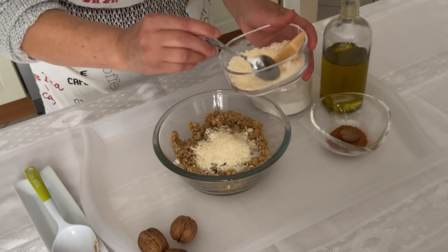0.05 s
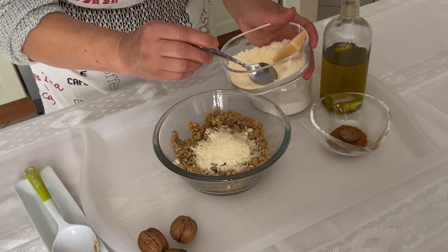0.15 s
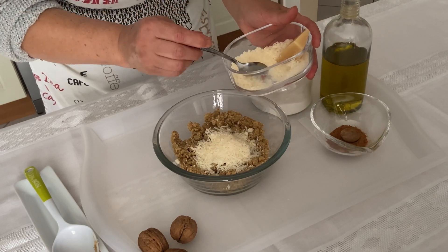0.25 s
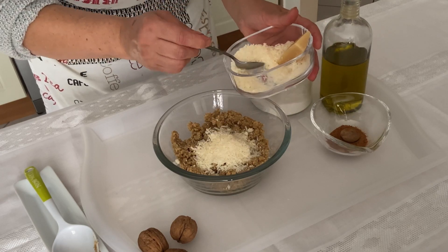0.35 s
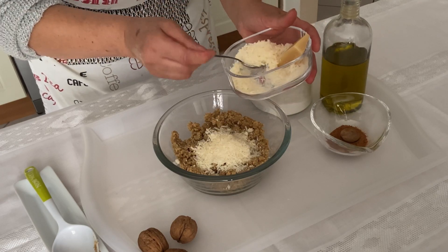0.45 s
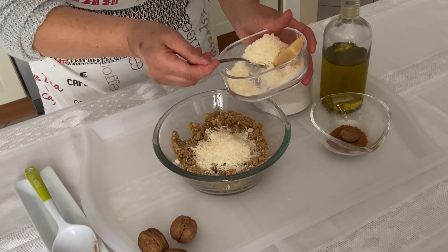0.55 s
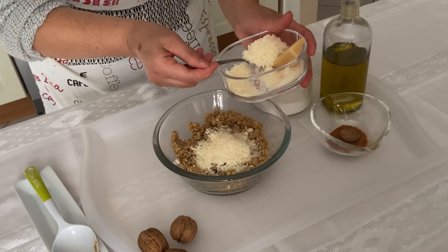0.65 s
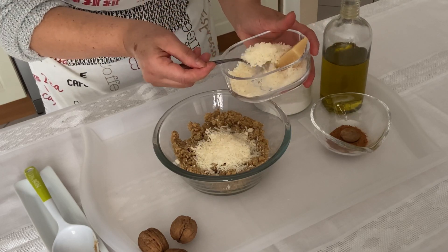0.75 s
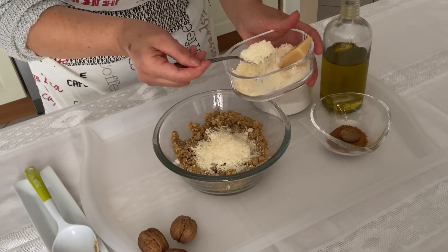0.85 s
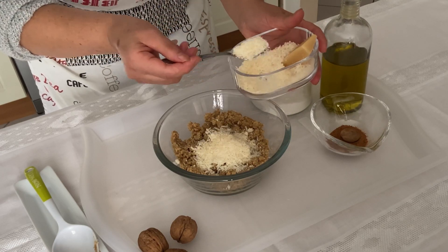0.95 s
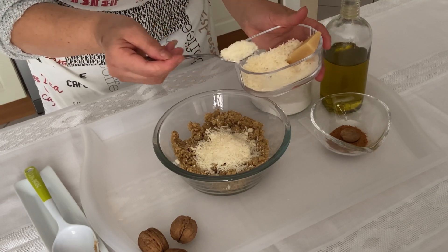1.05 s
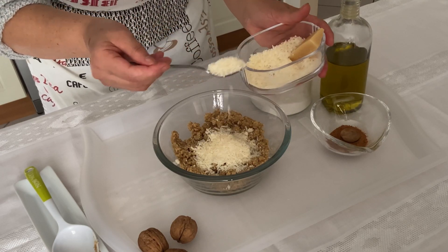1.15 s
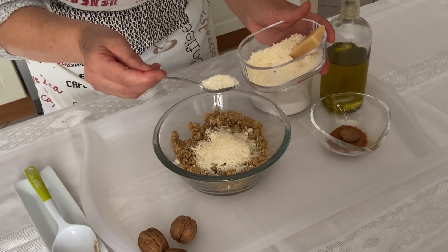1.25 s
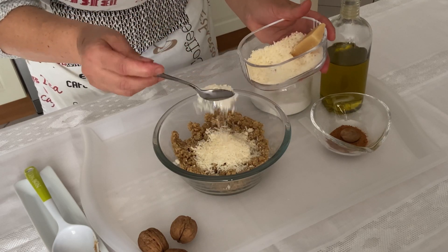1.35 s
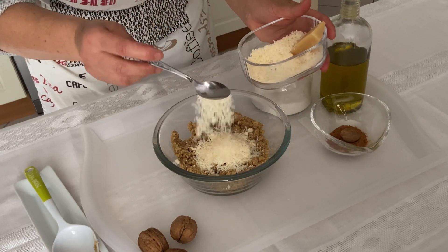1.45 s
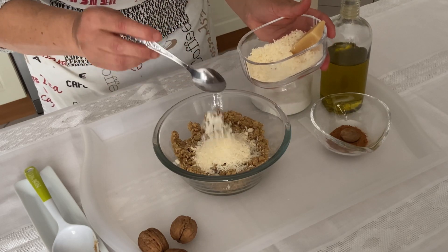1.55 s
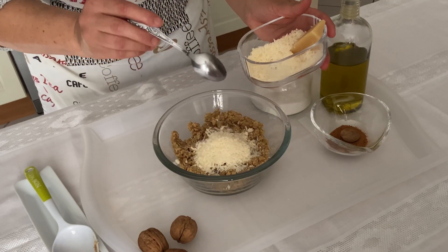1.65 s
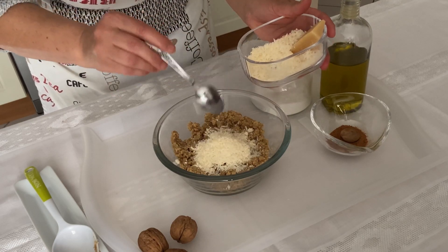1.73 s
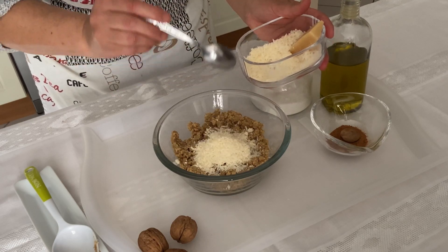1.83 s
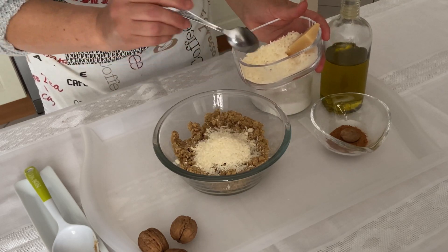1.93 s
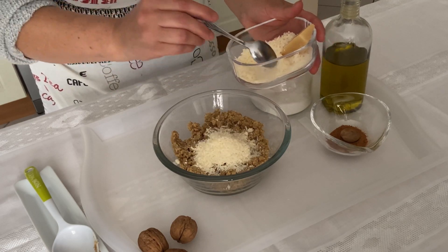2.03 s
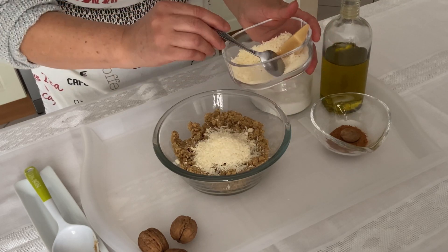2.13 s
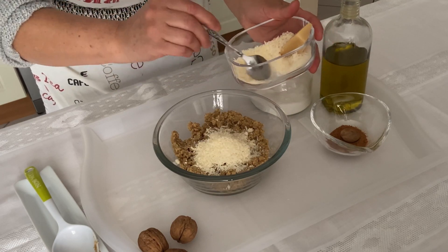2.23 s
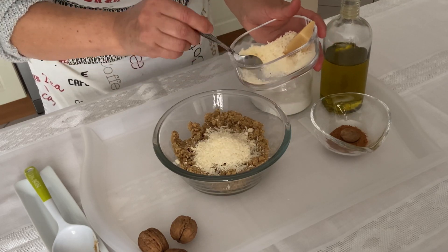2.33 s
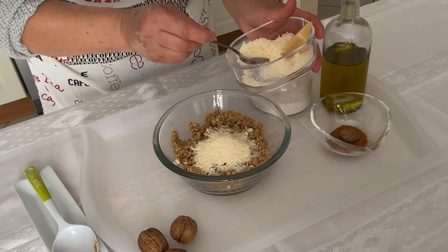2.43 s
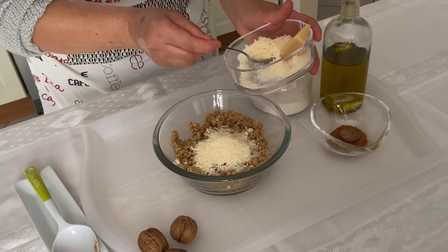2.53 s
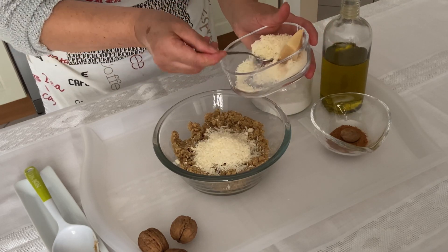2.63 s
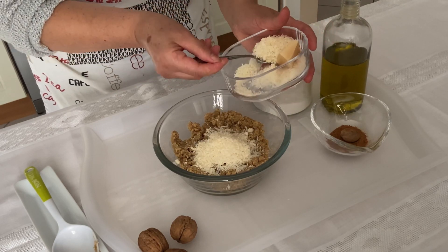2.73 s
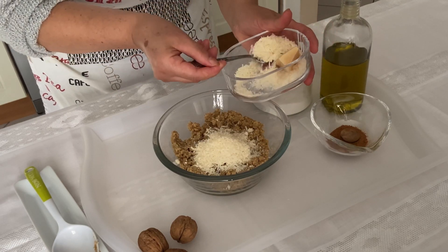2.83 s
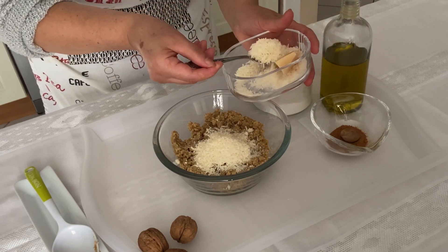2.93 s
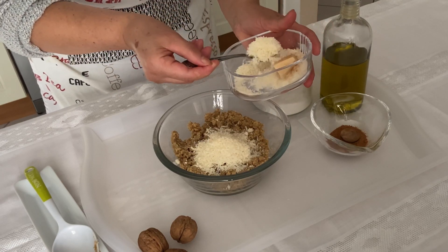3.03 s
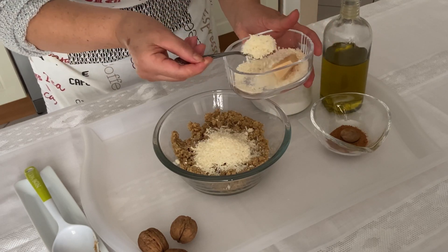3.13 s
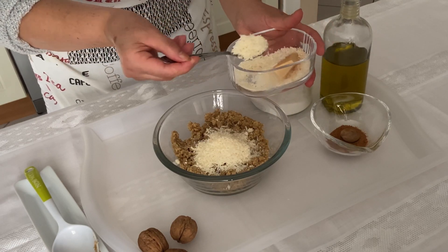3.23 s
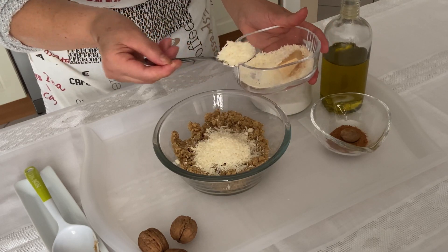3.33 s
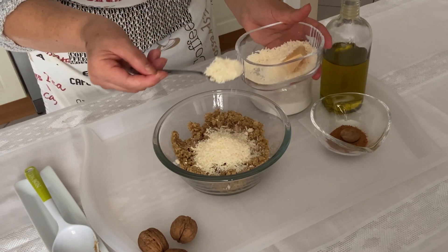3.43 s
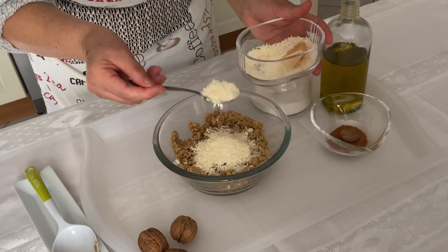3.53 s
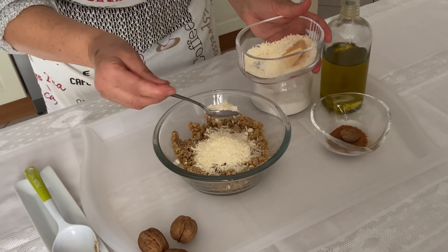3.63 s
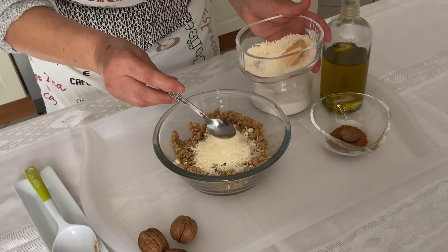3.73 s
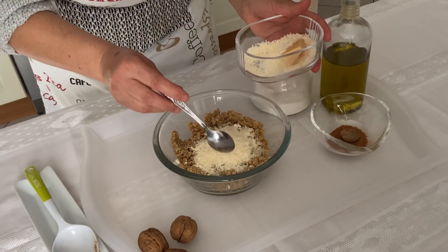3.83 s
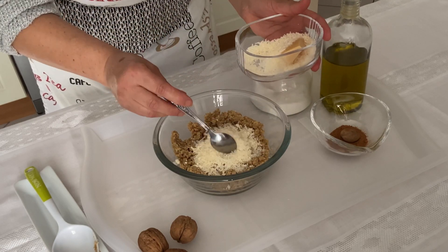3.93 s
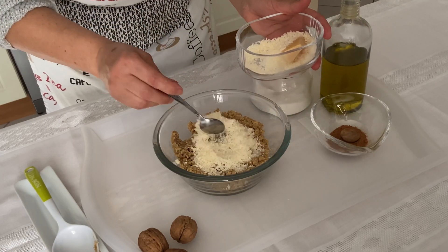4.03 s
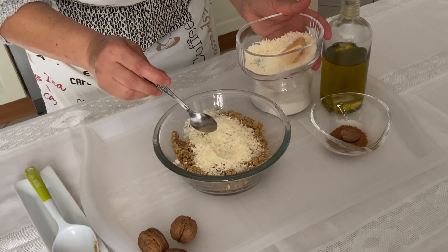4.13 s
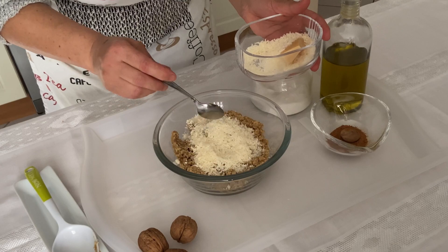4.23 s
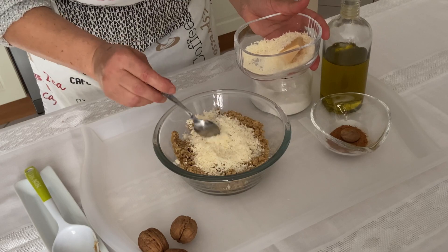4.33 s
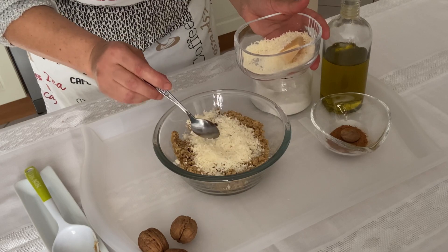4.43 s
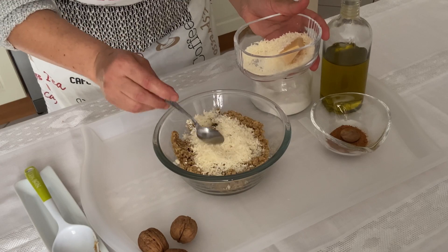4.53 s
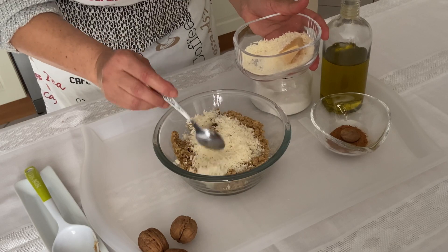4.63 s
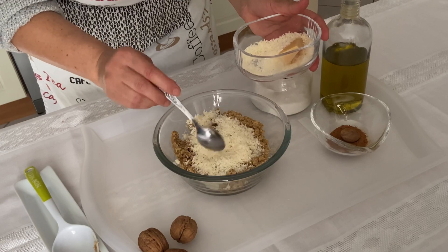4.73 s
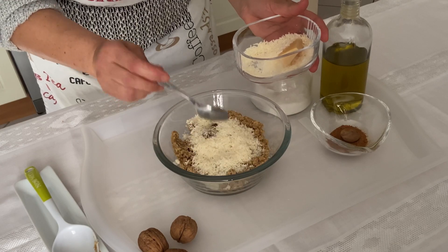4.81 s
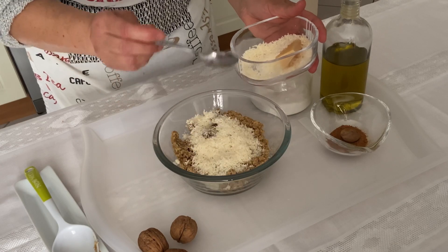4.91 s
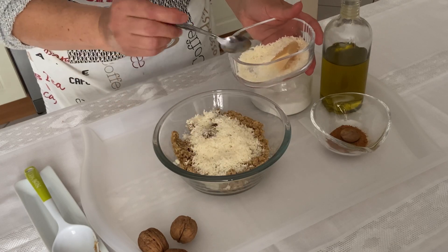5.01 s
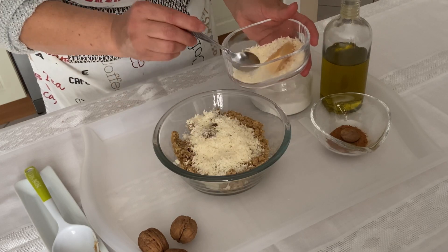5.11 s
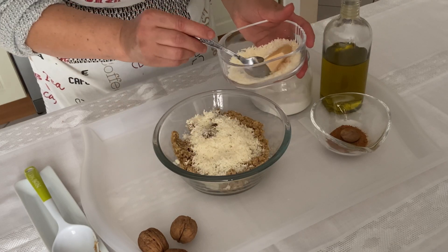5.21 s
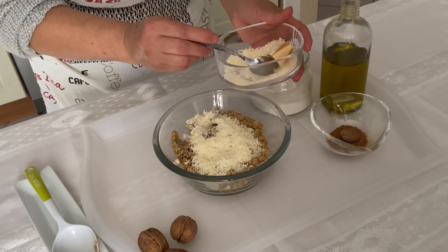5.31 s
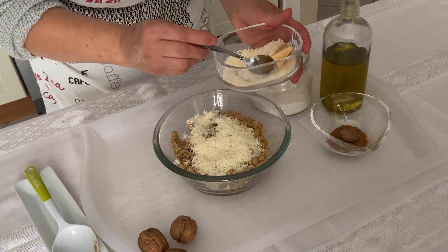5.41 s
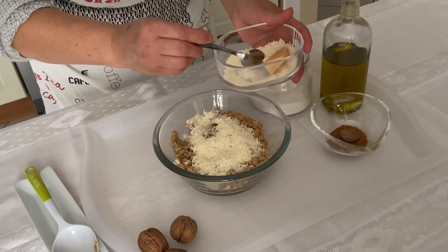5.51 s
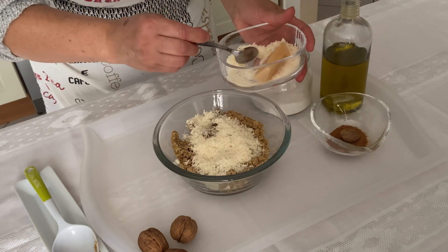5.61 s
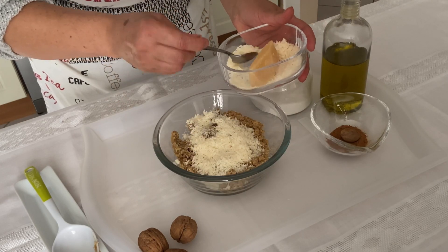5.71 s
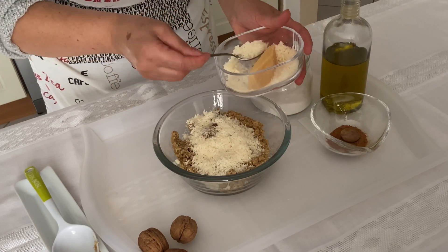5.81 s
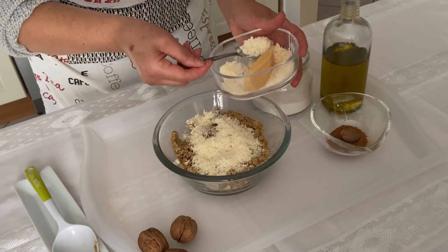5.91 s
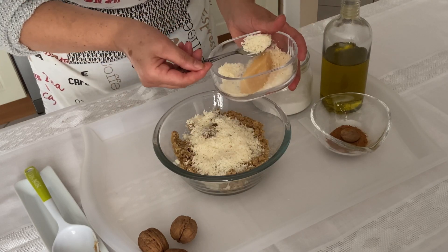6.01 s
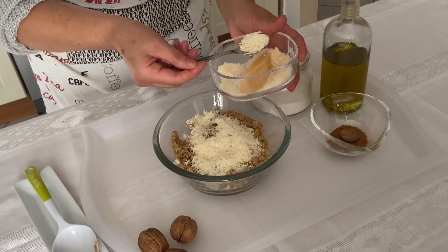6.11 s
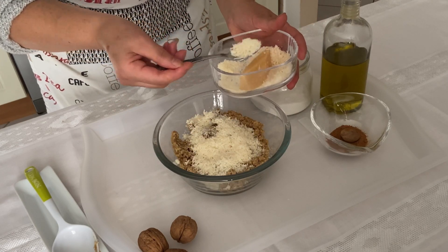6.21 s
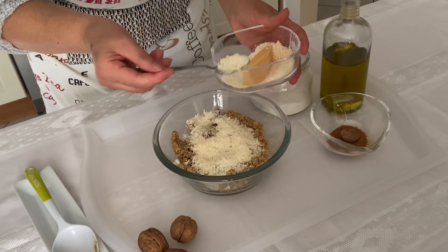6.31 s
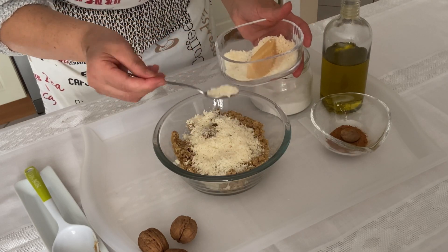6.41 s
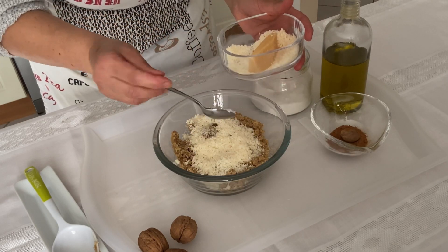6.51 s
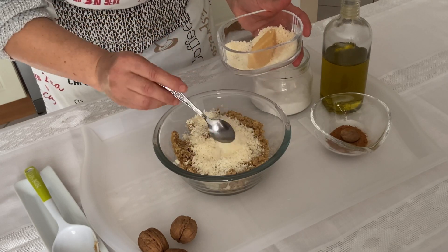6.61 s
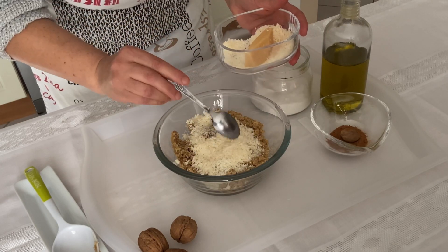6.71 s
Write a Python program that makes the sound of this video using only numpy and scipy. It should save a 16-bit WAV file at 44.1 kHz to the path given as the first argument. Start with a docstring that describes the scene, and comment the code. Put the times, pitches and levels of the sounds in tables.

```python
"""Bright clinks and gritty scrapes: a steel spoon scoops grated cheese three times from a glass bowl.
Each blow rings the same modes of bowl and spoon, weighted by where it lands; dragged along the wall,
the spoon ticks in tiny slips and squeaks as it sticks. The hand holding the bowl rustles and bumps.
The place is a quiet kitchen, small and hard, which prolongs the rings over a low steady rumble.
A pair of microphone ports listens close to the bowl."""
import sys
import numpy as np
from scipy import signal
from scipy.fft import rfft, irfft
from scipy.io import wavfile

SR = 44100
rng = np.random.default_rng(int(sys.argv[2]) if len(sys.argv) > 2 else 0)


def transcribe(signal):
    """Save signal, clipped to [-1, 1], as a 16-bit WAV file at the path in sys.argv[1]."""
    frames = np.atleast_2d(signal).T
    limited = np.clip(frames, -1, 1)
    pcm = np.round(limited * 32767).astype(np.int16)
    wavfile.write(sys.argv[1], SR, pcm)


N = 297945
TIME = np.arange(N) / SR

# modes of bowl and spoon: (frequency [Hz])
MODE_HZ = np.array([1845, 2023, 2234, 2355, 2490, 2900, 3250, 4083, 4216, 4335, 5230, 5930, 6305, 6622, 7300, 7710, 8580, 9970, 10385, 11800, 12537, 13200, 14150])
# one row a mode: (free t60 [s], then relative level [dB] when struck at each of contact places 0-5)
MODES = [(0.042, -44, -37.5, -46, -46.5, -52, -52), (0.042, -45, -44.5, -27.5, -52, -42, -46.5),
         (0.072, -42, -20.5, -11, -22.5, -36.5, -36.5), (0.025, -33.5, -13.5, -19, -34, -36, -41),
         (0.041, -36.5, -39, -23, -24.5, -38, -34), (0.027, -37.5, -38.5, -40, -35, -35, -28),
         (0.03, -38, -60.5, -53.5, -53.5, -40.5, -44), (0.08, -44, -32, -22.5, -41.5, -37, -52),
         (0.035, -46, -21, -28.5, -26, -42.5, -52.5), (0.064, -47.5, -49.5, -42.5, -47, -56.5, -28.5),
         (0.02, -64, -51, -61, -40, -36, -51), (0.03, -49.5, -51, -40.5, -37.5, -28, -77),
         (0.04, -41.5, -28.5, -26.5, -22, -22.5, -39), (0.073, -46.5, -26, -59.5, -57.5, -47, -35.5),
         (0.091, -61.5, -53.5, -51.5, -49.5, -36, -45), (0.064, -47, -39, -48.5, -72, -21.5, -46.5),
         (0.045, -48, -33, -55.5, -44, -39.5, -41.5), (0.05, -60.5, -46, -37.5, -45.5, -30.5, -38.5),
         (0.055, -51, -43, -50.5, -57.5, -31.5, -42.5), (0.047, -54.5, -47.5, -40.5, -51.5, -34, -63),
         (0.055, -92, -54, -50.5, -64, -32, -55), (0.03, -60.5, -48, -61.5, -57, -45, -63.5),
         (0.035, -58, -48, -49, -56, -46.5, -37.5)]
# the modes that belong to the rim: (frequency [Hz])
RIM_HZ = [2234, 4083, 6305, 7710, 10385]


def undb(db):
    """Decibels to gain."""
    return 10 ** (np.asarray(db) / 20)


def unit(x):
    """Scale to rms 1."""
    return x / np.sqrt(np.mean(x ** 2))


def at(points, hz):
    """Read (frequency [Hz], value) points on a log-frequency axis."""
    f, value = np.transpose(points)
    return np.interp(np.log(np.maximum(hz, 1)), np.log(f), value)


def freqs(x):
    """Frequencies of the spectrum of x."""
    return np.fft.rfftfreq(x.shape[-1], 1 / SR)


def colour(x, spectrum):
    """Filter x by (frequency [Hz], level [dB]) points."""
    return irfft(rfft(x) * undb(at(spectrum, freqs(x))), x.shape[-1])


def convolve(x, response):
    """Pass x through a response."""
    return signal.fftconvolve(x, response)[:N]


def add(out, start_s, x):
    """Mix x into out from start_s on."""
    i = int(start_s * SR)
    out[i:i + len(x)] += x[:N - i]


def click(spectrum, size=512):
    """Shortest causal pulse with this spectrum, of unit energy."""
    cepstrum = irfft(np.log(undb(at(spectrum, np.fft.rfftfreq(size, 1 / SR)))))
    cepstrum[1:size // 2] *= 2
    cepstrum[size // 2 + 1:] = 0
    pulse = irfft(np.exp(rfft(cepstrum)))
    return pulse / np.linalg.norm(pulse)


def narrow_noise(hz, width_hz, channels=1):
    """Noise in one steep-sided resonance."""
    noise = rng.standard_normal((channels, N))
    return unit(irfft(rfft(noise) / (1 + (2 * (freqs(noise) - hz) / width_hz) ** 2), N))


def swells(events, spectrum):
    """Soft bell-shaped bursts of coloured noise."""
    envelope = sum(undb(db) * np.exp(-((TIME - peak_s) / half_s) ** 2) for peak_s, half_s, db in events)
    return envelope * unit(colour(rng.standard_normal(N), spectrum))


def ring(hz, t60, db, rise_s=0.00077):
    """Sum of decaying modes, which take a moment to spread round the bowl."""
    t = TIME[:SR * 3 // 4]
    modes = np.sin(2 * np.pi * np.outer(hz, t)) * np.exp(-np.log(1000) * np.outer(1 / t60, t))
    return undb(db) @ modes * (1 - np.exp(-t / rise_s))


def room_tone(alike_hz=380, rumble_db=-64.5, lean_left_db=1.16):
    """The kitchen at rest: rumble, mains hum and a few resonances, alike at both ports in the bass."""
    # spectrum of the rumble: (frequency [Hz], relative level [dB])
    rumble_spectrum = [(15, -48), (25, -17.5), (47, -3), (87, -2), (170, -9), (277, -10), (531, -17),
                       (818, -14), (962, -16.5), (2050, -21.5), (2550, -26), (3250, -24.5), (3620, -32.5),
                       (11300, -52.5), (16000, -59)]
    # hum, steady resonances and faint hiss: (frequency [Hz], width [Hz], level [dB])
    hum_bands = [(102.7, 5.8, -74), (204.6, 11, -83.5), (275.6, 12, -86), (731, 13, -80),
                 (786.4, 22, -74.5), (878, 18, -83), (1020, 11, -85), (3170, 240, -90), (10900, 2500, -103)]
    mid, side = rfft(rng.standard_normal((2, N)))
    coherence = .92 / (1 + (freqs(TIME) / alike_hz) ** 2)
    air = irfft(mid * np.sqrt(1 + coherence) + np.outer([1, -1], side * np.sqrt(1 - coherence)), N)
    rumble = unit(colour(air, rumble_spectrum)) * undb(rumble_db)
    hum = sum(undb(db) * narrow_noise(hz, width, channels=1 if hz < alike_hz else 2)
              for hz, width, db in hum_bands)
    return (rumble + hum) * undb([[lean_left_db], [-lean_left_db]])


def kitchen_reverb(x, wet_db=-6, build_s=.006, treble_db=-3):
    """Hard walls return a dense tail, unrelated left and right, that dies sooner in the treble."""
    # decay of the room: (frequency [Hz], t60 [s])
    decays = [(200, 0.47), (2000, 0.57), (6000, 0.54), (13000, 0.33)]
    t = TIME[:SR * 4 // 5]
    noise = rfft(rng.standard_normal((2, len(t))))
    centres = np.array(decays)[:, 0]
    tail = np.zeros((2, len(t)))
    for share, (hz, t60) in zip(np.eye(len(centres)), decays):
        band = irfft(noise * at(np.c_[centres, share], freqs(t)), len(t))
        tail += band * np.exp(-np.log(1000) * t / t60) * undb(treble_db * hz / centres[-1])
    build_up = 1 - np.exp(-(t / build_s) ** 2)
    response = unit(tail * build_up) * undb(wet_db) / np.sqrt(len(t))
    return np.array([convolve(x, side) for side in response])


def microphone_ports(x):
    """Close to the bowl, the two ports hear the direct sound with different phase and level."""
    # phase between the ports: (frequency [Hz], lead of the left [rad])
    phase_lead = [(900, 0), (1400, -.3), (2230, 1.3), (2900, .9), (4150, 0), (6300, .1), (7700, -.8),
                  (8600, -2.5), (10300, -4.8), (12500, -8.6), (14200, -10.3)]
    # level between the ports: (frequency [Hz], left minus right [dB])
    balance = [(1000, 0), (2200, 2.5), (4200, 4.5), (6300, 3.5), (8000, -0.5), (14000, 0.5)]
    left = undb(at(balance, freqs(x)) / 2) * np.exp(.5j * at(phase_lead, freqs(x)))
    return irfft(rfft(x) * np.array([left, 1 / left]), N)


def handling_bumps():
    """Dull bumps of handling, the same at both ports."""
    # low swells: (time [s], half-length [s], level [dB])
    bumps = [(1.4, 0.13, -65), (1.58, 0.041, -63), (5.28, 0.09, -56.5), (5.88, 0.15, -62)]
    # their spectrum: (frequency [Hz], relative level [dB])
    bump_spectrum = [(25, -16.5), (70, 8.5), (130, 0.5), (250, -3), (500, -13.5), (1500, -53)]
    return swells(bumps, bump_spectrum)


def cheese_rustles():
    """Hand and cheese rustle softly at the bowl."""
    # hissy swells: (time [s], half-length [s], level [dB])
    rustles = [(4.86, 0.072, -77.5), (6.36, 0.087, -77.5), (6.65, 0.09, -73.5)]
    # their spectrum: (frequency [Hz], relative level [dB])
    rustle_spectrum = [(300, -12.5), (2000, 3), (6000, -8.5), (9000, -12), (11000, -9), (15000, -20)]
    return swells(rustles, rustle_spectrum)


def bowl_radiation(x, corner_hz=450):
    """A small bowl gives off almost no bass."""
    return signal.sosfilt(signal.butter(2, corner_hz, "high", fs=SR, output="sos"), x)


def drag_strength(bite_s=.02, ease_db_per_s=18, lift_s=0.067):
    """In every drag the spoon bites, eases as it fills, then lifts off."""
    # drags along the glass: (start [s], length before the lift [s], relative friction [dB])
    drags = [(0.405, 0.12, -52.5), (2.186, 0.37, -65), (2.561, 0.06, -69.5), (5.434, 0.039, -65.5),
             (5.56, .025, -62.5), (5.639, .045, -52.5), (5.748, .16, -54.5)]
    out = np.zeros(N)
    for start_s, length_s, db in drags:
        t = np.arange(int((length_s + lift_s) * SR)) / SR
        bite = np.minimum(t / bite_s, 1)
        lift = np.clip((length_s + lift_s - t) / lift_s, 0, 1) ** 2
        add(out, start_s, bite * lift * undb(db - ease_db_per_s * t))
    return out


def spoon_scrape(slips_per_s=900, spread_db=0.5, gain_db=-4, t60_share=0.31, tilt_db_per_octave=-2):
    """Tiny uneven slips tick the glass; the pressure of the spoon shortens and dulls the modes."""
    # gritty click of one slip: (frequency [Hz], relative level [dB])
    grit_spectrum = [(200, -30.5), (600, -15.5), (950, -2.5), (1400, -9.5), (2200, 2.5), (3300, -4),
                     (5000, -12), (6500, -14), (8000, -21.5), (9200, -32.5), (10500, -16.5), (14500, -38)]
    sizes = undb(spread_db * np.minimum(rng.exponential(size=N), 4)) * rng.choice([-1, 1], N)
    slipping = rng.random(N) < slips_per_s / SR
    slips = unit(sizes * slipping) * drag_strength()
    t60, *place_db = np.transpose(MODES)
    mode_db = place_db[0] + tilt_db_per_octave * np.log2(MODE_HZ / RIM_HZ[0])
    pressed_ring = ring(MODE_HZ, t60 * t60_share, mode_db)
    glass = convolve(slips, pressed_ring / np.linalg.norm(pressed_ring))
    grit = convolve(slips, click(grit_spectrum))
    return (glass + grit) * undb(gain_db)


def spoon_squeaks(gain_db=-1, flutter_hz=300, jitter_hz=45, rough_db=3):
    """Stick-slip locks onto a resonance: short tones, unsteady in pitch and strength."""
    # the spoon sings: (start [s], length [s], first pitch [Hz], last pitch [Hz], relative level [dB])
    squeaks = [(0.331, 0.27, 4130, 4490, -64), (0.491, 0.021, 2444, 2495, -47),
               (0.542, 0.021, 2350, 2440, -50.5), (2.187, 0.014, 2990, 2870, -62.5),
               (2.29, 0.047, 1920, 1833, -40.5), (2.327, .012, 2600, 2510, -35),
               (5.103, 0.031, 2203, 2255, -32), (5.437, 0.049, 2820, 2650, -64),
               (5.666, 0.038, 4280, 4316, -46), (5.7, 0.1, 4330, 4310, -57.5),
               (5.832, 0.025, 2670, 2475, -46.5), (5.854, 0.031, 2440, 2340, -50)]
    out = np.zeros(N)
    waver, flicker = narrow_noise(0, flutter_hz, channels=2)
    for start_s, length_s, first_hz, last_hz, db in squeaks:
        start, n = int(start_s * SR), int(length_s * SR)
        span = slice(start, start + n)
        hz = np.linspace(first_hz, last_hz, n) + jitter_hz * waver[span]
        strength = undb(db + gain_db + rough_db * flicker[span]) * signal.windows.tukey(n, .5)
        add(out, start_s, strength * np.sin(2 * np.pi * np.cumsum(hz) / SR))
    return out


def wall_knock(hollow_db=-4):
    """Dull part of a blow: a short crack, and a hollow note as the wall flexes."""
    # flexing modes of the wall: (frequency [Hz], t60 [s], relative level [dB])
    hollow_modes = [(870, 0.027, 0.5), (1307, 0.074, -13.5), (1704, 0.018, -5.5)]
    # spectrum of the crack: (frequency [Hz], relative level [dB])
    crack_spectrum = [(100, -25), (400, -17), (700, -8.5), (1000, 2.5), (1300, 6), (1600, 2), (2000, -0.5),
                      (2700, 0.5), (3600, -17.5), (6000, -34.5), (16000, -53.5)]
    note = ring(*np.transpose(hollow_modes))
    out = undb(hollow_db) * note / np.linalg.norm(note)
    add(out, 0, click(crack_spectrum))
    return out


def spoon_clinks(impact_db=-4, chatter=.24, chatter_s=0.0041, damping=0.16, muting_db=-14, detune=.0015):
    """Each blow rings the modes of its place; steel chatters on glass with a knock and a bright tick."""
    # spoon on glass, levels relative: (time [s], ring [dB], knock [dB], tick [dB],
    # brightness [dB/octave], grip [0-1]: how firmly the spoon stays on the wall)
    blows = [(.3145, 4, -56, -33, -1, 1), (.418, -5.5, -46, -34, -4.5, .8),
             (2.2291, -20, -21, -36, -3.5, 0.3), (2.2767, 2, -22, -14.5, -1, 0.94),
             (2.2839, -12.5, -28, -19, 7, 1), (2.329, -14.5, -24, -30, -2.5, .9),
             (2.3322, -3, -26.5, -25.5, -1.5, 0.9), (2.3768, -17, -19.5, -11.5, -1.5, .4),
             (5.0378, 0, -6, -7.5, -1.5, 0.53), (5.0622, -6, -10, -22, -4.5, 0.55),
             (5.0775, -10, -15, -27, 1, 0.3), (5.1512, 0, -19.5, -13, 2, 0.75),
             (5.1765, 1.5, -8.5, -5, 0.5, 0), (5.513, -34, -52, -37.5, -3, .5),
             (5.572, -20.5, -38, -33, -14, .5), (5.639, 3, -23, -18.5, -5.5, 1)]
    # where each blow lands: (contact place [0-5])
    places = [0, 0, 4, 1, 1, 1, 5, 4, 2, 2, 2, 3, 4, 0, 5, 5]
    # faint pure after-ring of each rim mode: (t60 [s], level against the first ring, unmuted [dB])
    after_ring = [(0.98, -21.5), (0.53, -36), (.45, -23), (0.12, -21), (0.59, -21.5)]
    # spectrum of the tick: (frequency [Hz], relative level [dB])
    tick_spectrum = [(300, -36.5), (1500, -9), (3000, -1), (4800, -2.5), (6300, 5), (8200, -0.5),
                     (9200, -17.5), (10300, 3.5), (12300, -4.5), (13500, -9.5), (16000, -13.5)]
    t60, *place_db = np.transpose(MODES)
    rim_t60, rim_db = np.transpose(after_ring)
    on_rim = np.isin(MODE_HZ, RIM_HZ)
    rings, knocks, ticks = np.zeros((3, N))
    t = TIME[:SR // 20]
    for (start_s, ring_db, knock_db, tick_db, brightness, grip), place in zip(blows, places):
        mode_db = place_db[int(place)] + ring_db + brightness * np.log2(MODE_HZ / RIM_HZ[0])
        # a spoon that stays on the wall pulls the modes off pitch, shortens them and mutes the rim
        hz = MODE_HZ * (1 + detune * grip * rng.standard_normal(len(MODE_HZ)))
        add(rings, start_s, ring(hz, t60 / (1 + damping * grip), mode_db))
        add(rings, start_s, ring(RIM_HZ, rim_t60, mode_db[on_rim] + rim_db + muting_db * grip))
        force = chatter * rng.standard_normal(len(t)) * np.exp(-t / chatter_s)
        force[0] = 1  # first contact, ahead of the chatter
        force /= np.linalg.norm(force)
        add(knocks, start_s, undb(knock_db + impact_db) * force)
        add(ticks, start_s, undb(tick_db + impact_db) * force)
    return rings + convolve(knocks, wall_knock()) + convolve(ticks, click(tick_spectrum))


def scene():
    """Spoon and bowl close to the microphone, the kitchen around them."""
    close = bowl_radiation(spoon_clinks() + spoon_scrape() + spoon_squeaks()) + cheese_rustles()
    return microphone_ports(close) + kitchen_reverb(close) + handling_bumps() + room_tone()


def record(dry, low_cut_hz=35, top_hz=15300):
    """The recorder thins the deepest rumble and cuts the top steeply."""
    thinned = signal.sosfilt(signal.butter(2, low_cut_hz, "high", fs=SR, output="sos"), dry)
    return signal.sosfilt(signal.ellip(8, .2, 70, top_hz, fs=SR, output="sos"), thinned)


dry = scene()
out = record(dry)
transcribe(out)
```